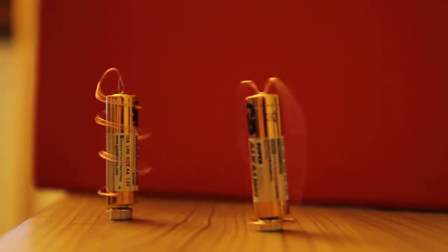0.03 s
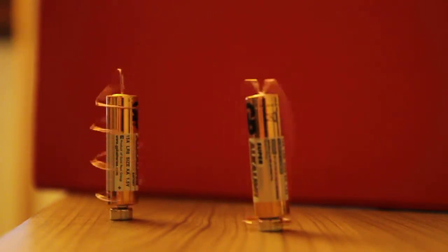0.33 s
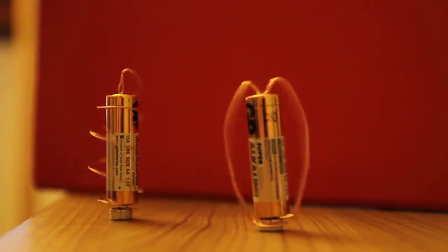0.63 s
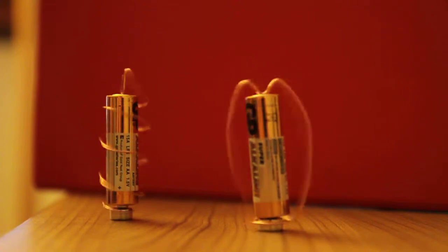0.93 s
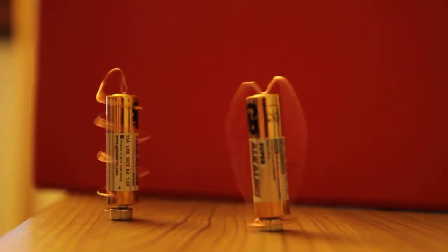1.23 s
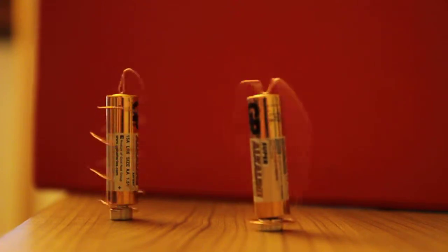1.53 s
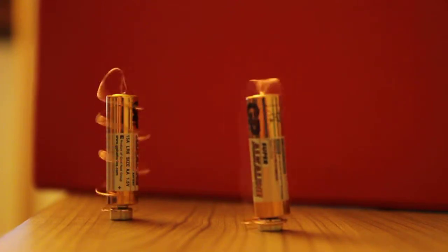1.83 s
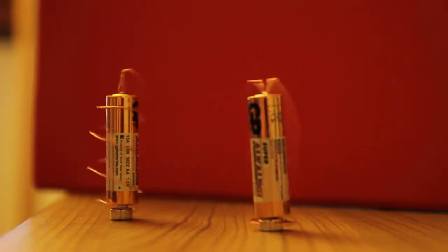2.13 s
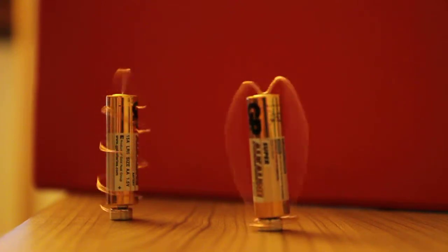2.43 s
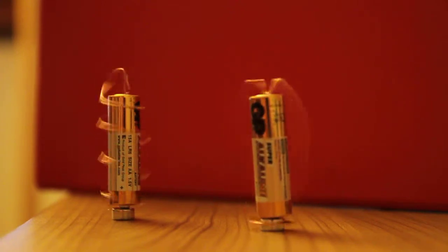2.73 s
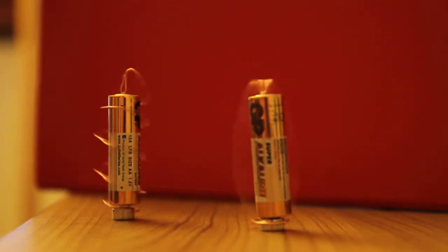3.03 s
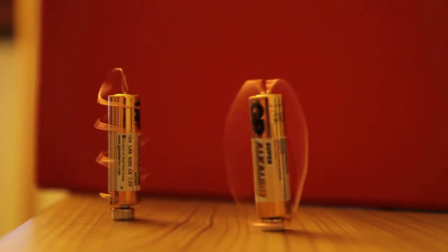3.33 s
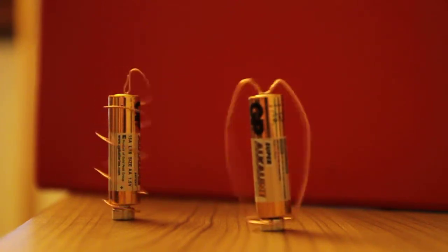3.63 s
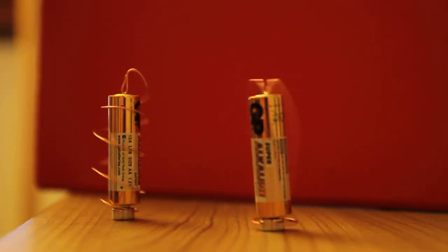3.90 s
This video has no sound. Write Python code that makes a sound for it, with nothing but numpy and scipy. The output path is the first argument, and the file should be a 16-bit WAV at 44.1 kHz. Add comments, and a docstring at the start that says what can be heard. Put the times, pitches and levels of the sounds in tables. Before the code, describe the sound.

A rapid, uneven metallic rattle comes from two wires scraping and tapping as they spin around batteries. The wobbling batteries rumble on a wooden shelf over faint room hum, until a few hard knocks finish it.

```python
"""Two bent copper wires spin round upright batteries on a wooden shelf in a small room.
They scrape on the terminals and magnets in tiny slips, and tick, tap and clank as they bounce;
their thin top modes ring on. The wobbling batteries make the shelf rumble, over room air and
a faint mains hum. A few hard knocks come last, then the sound stops."""
import sys
import numpy as np
from scipy import signal
from scipy.fft import rfft, irfft, next_fast_len
from scipy.io import wavfile
from scipy.ndimage import uniform_filter1d

SR = 44100
rng = np.random.default_rng(int(sys.argv[2]) if len(sys.argv) > 2 else 0)


def master(y):
    """Save y as 16-bit WAV."""
    cut = np.clip(np.atleast_2d(y).T, -1, 1)
    pcm = np.round(cut * 32767)  # scale
    wavfile.write(sys.argv[1], SR, pcm.astype(np.int16))


N = 176400
TIME_S = np.arange(N) / SR

# room air: freq_hz, gain_db
AIR_SPECTRUM = [(25, -30), (80, 6.5), (200, 12), (1000, -3), (4000, -10), (16000, -29)]
# battery and shelf resonances: freq_hz, width_hz, lift_db
BODY_MODES = [(449, 12, 4.5), (538, 101, 9.5), (679.4, 20.6, 13), (916.5, 31, 5), (1035, 11.2, 11),
              (1093.6, 34, 10), (1350, 122, 10), (1736, 99, 7.5), (2063, 200, 6.5), (2480, 130, 7),
              (2828, 190, 8), (3097, 120, 6), (3580, 220, 8.5), (4880, 260, 7), (5317, 230, 11.5)]
# shelf rumble: time_s, level_db
RUMBLE_LEVELS = [(0, -43), (.1, -40), (.28, -44.5), (.46, -56.5), (.475, -47.5), (.58, -39.5), (.73, -48.5),
                 (.77, -41.5), (1.2, -42), (1.85, -44.5), (2.9, -42.5), (3.11, -47.5), (3.28, -41.5),
                 (3.43, -46), (3.55, -39), (3.92, -48)]
# shelf rumble: freq_hz, gain_db
RUMBLE_SPECTRUM = [(30, -45), (70, -23), (130, -12), (220, 1.5), (330, 0.5), (450, 4), (620, -12), (850, 3),
                   (1200, -3), (1700, -16.5), (2600, -18), (4500, -21.5)]
# a battery rocks: start_s, level_db
ROCKS = [(0.155, -44), (0.584, -39), (0.757, -47.5), (1.336, -46), (1.441, -44), (1.536, -43), (1.653, -43),
         (1.778, -41), (1.93, -40.5), (2.341, -41), (2.46, -45.5), (2.556, -41), (2.845, -38.5),
         (2.961, -38.5), (3.068, -45.5), (3.162, -41.5), (3.221, -45)]
# hard knocks: start_s, level_db, ring_hz, lift_db, lowpass_hz
KNOCKS = [(3.5339, -32.5, 2650, 18, 3380), (3.9300, -37, 2320, 7, 1680), (3.9453, -24.5, 2560, 9.5, 4900)]
# hard knock: freq_hz, gain_db
KNOCK_SPECTRUM = [(80, -41), (400, -2), (1200, -9), (2200, -4.5), (4300, -1.5), (8000, -9.5), (16000, 2)]
# top modes of the wires: freq_hz, width_hz, lift_db
WIRE_MODES = [(13930, 360, 10.5), (14260, 100, 12), (14920, 100, 8)]
# wire after-ring: freq_hz, gain_db
SHIMMER_SPECTRUM = [(3000, -18.5), (5300, 3.5), (12500, -16), (14200, 1)]
# wire tip resonances: freq_hz, width_hz, lift_db
TIP_MODES = [(6290, 460, 5), (7140, 83, 4), (9930, 200, 5), (10800, 670, 6.5)]
# tip on metal: freq_hz, gain_db
TIP_SPECTRUM = [(500, 4.5), (1500, 0.5), (3000, 6), (4200, 0.5), (6200, 6), (8500, 5.5), (12000, -2.5),
                (16000, 2)]
# light tip touches: start_s, relative_db
TICKS = [(0.018, -42.5), (0.067, -41.5), (0.143, -38), (0.2795, -40), (0.471, -48), (0.5545, -39.5),
         (0.5967, -48), (0.652, -46), (0.7635, -41), (1.0578, -41), (1.0714, -39), (1.2061, -41),
         (1.5373, -39.5), (1.679, -41), (1.71, -39.5), (1.818, -42.5), (1.8672, -38.5), (2.0022, -40),
         (2.0418, -40), (2.229, -40), (2.6116, -40), (2.7228, -41), (2.759, -42), (2.8005, -41.5),
         (3.0035, -37.5), (3.1952, -40.5), (3.2127, -38), (3.3379, -41.5), (3.6044, -43.5), (3.677, -42)]
# soft wire taps: start_s, ring_db, ring_hz, ping_db
TAPS = [(0.0892, -35, 2600, -44.5), (0.616, -36.5, 2740, -45), (0.784, -44, 2900, -51),
        (0.8136, -32.5, 2700, -41.5), (1.0018, -32.5, 2630, -48.5), (1.189, -41, 2850, -51),
        (1.345, -39, 2860, -61), (1.3737, -35.5, 3000, -42.5), (1.5905, -38.5, 2770, -46),
        (1.625, -43, 2540, -65), (1.731, -40.5, 2310, -46), (2.095, -38.5, 2980, -42.5),
        (2.1926, -39, 2700, -42.5), (2.3453, -37, 2660, -45), (2.5845, -35, 3000, -45),
        (2.8751, -41, 2900, -39.5), (3.478, -35.5, 3330, -37.5), (3.573, -39, 2180, -44.5),
        (3.8, -40, 3330, -41)]
# hard hits of wire on battery: start_s, level_db
CLANKS = [(0.205, -38.5), (0.7455, -37), (0.851, -36.5), (0.9346, -33.5), (1.0305, -36), (1.1235, -35),
          (1.2162, -39.5), (1.3107, -33.5), (1.3995, -37), (1.4312, -38.5), (1.5191, -33.5),
          (2.3018, -35.5), (2.5203, -32.5), (2.6983, -34.5), (2.89, -37)]
# whole-wire resonances: freq_hz, width_hz, lift_db
CLANK_MODES = [(1755, 120, 9), (4820, 340, 7.5), (6550, 260, 6)]
# hard wire hit: freq_hz, gain_db
CLANK_SPECTRUM = [(600, -22), (1400, 3.5), (3400, 2), (4100, -10.5), (7500, 1), (9000, -1), (11500, -13),
                  (16000, -10)]
# scraping, low where the wires run free: time_s, relative_db
SCRAPE_LEVELS = [(0, -43.5), (.34, -44.5), (.463, -60.5), (.472, -47.5), (.58, -41.5), (.72, -46),
                 (1.2, -45.5), (1.86, -48.5), (1.9, -76), (1.98, -38.5), (2.04, -41.5), (2.27, -45),
                 (3.0, -45), (3.08, -47.5), (3.21, -37.5), (3.44, -47.5), (3.68, -42.5), (3.85, -44.5),
                 (3.92, -64)]
# copper on steel: freq_hz, gain_db
SCRAPE_SPECTRUM = [(700, -12.5), (1400, 0), (3200, 1), (4200, -4.5), (5500, -4), (6300, 3), (7300, -8.5),
                   (9000, -6), (9400, -14.5), (10600, -2), (11500, -10.5), (15500, -17)]


def from_db(db):
    """Decibels to gain."""
    return 10 ** (np.asarray(db) / 20)


def unit_rms(x):
    """Scale to rms 1."""
    return x / np.sqrt(np.mean(x ** 2) + 1e-20)


def envelope(levels):
    """Level breakpoints to gain per sample."""
    return from_db(np.interp(TIME_S, *np.transpose(levels)))


def drift(corner_hz):
    """Slow noise, rms 1."""
    pole = np.exp(-2 * np.pi * corner_hz / SR)
    slow = signal.lfilter([1], [1, -2 * pole, pole * pole], rng.standard_normal(N + SR))
    return unit_rms(slow[SR:])


def band(x, low_hz, high_hz):
    """Causal band-pass."""
    return signal.sosfilt(signal.butter(2, [low_hz, high_hz], "band", fs=SR, output="sos"), x)


def colour(x, spectrum, modes=()):
    """Minimum-phase filter: broad spectrum plus resonances."""
    size = 2 * next_fast_len(len(x))
    hz = np.arange(size // 2 + 1) * SR / size
    knots_hz, knots_db = np.transpose(spectrum)
    db = np.interp(np.log(hz + 1), np.log(knots_hz), knots_db)
    db += sum(lift / (1 + (2 * (hz - centre) / width) ** 2) for centre, width, lift in modes)
    cepstrum = irfft(np.log(from_db(db)))
    cepstrum[1:size // 2] *= 2
    cepstrum[size // 2 + 1:] = 0
    return irfft(rfft(x, size) * np.exp(rfft(cepstrum)))[:len(x)]


def tail(t60_s, samples=6000):
    """Decaying noise, energy 1."""
    noise = rng.standard_normal(samples) * from_db(-60 * TIME_S[:samples] / t60_s)
    return noise / np.linalg.norm(noise)


def contact(t60_s, scatter_db):
    """A click and its close reflections."""
    hit = from_db(scatter_db) * tail(t60_s)
    hit[0] = 1
    return hit


def varied(modes, spread_db=3):
    """Each contact favours other modes."""
    return [(hz, width_hz, lift_db + rng.normal(0, spread_db)) for hz, width_hz, lift_db in modes]


def add(out, start_s, level_db, x):
    """Mix in an event; level_db is the rms of its energy spread over 20 ms."""
    start = int(start_s * SR)
    event = from_db(level_db) * x / np.linalg.norm(x) * np.sqrt(SR / 50)
    out[start:start + len(x)] += event[:N - start]


def room_air(level_db=-53):
    """Steady, dark noise."""
    return from_db(level_db) * unit_rms(colour(rng.standard_normal(N), AIR_SPECTRUM))


def mains_hum(pitch_hz=121.6, level_db=-61):
    """One faint, steady tone."""
    return from_db(level_db) * unit_rms(np.sin(2 * np.pi * pitch_hz * TIME_S))


def shelf(pressure, force_db, swing_db=2.5, coupling=0.55, rock_hz=469):
    """Wobbling batteries shake the board, rock now and then, and bump once."""
    shaking = rng.standard_normal(N) * from_db(swing_db * pressure + coupling * force_db)
    out = envelope(RUMBLE_LEVELS) * unit_rms(colour(shaking, RUMBLE_SPECTRUM, BODY_MODES))
    for start_s, level_db in ROCKS:
        add(out, start_s, level_db, band(tail(t60_s=0.068), rock_hz / 1.17, rock_hz * 1.144))
    bump = band(tail(t60_s=0.051), low_hz=59, high_hz=270)
    add(out, start_s=2.699, level_db=-40.5, x=bump)
    return out


def knocks(width_hz=980):
    """Hard, dry knocks, each with one short ring."""
    out = np.zeros(N)
    for start_s, level_db, ring_hz, lift_db, lowpass_hz in KNOCKS:
        hit = contact(t60_s=0.013, scatter_db=-3)
        knock = colour(hit, KNOCK_SPECTRUM, [(ring_hz, width_hz, lift_db)])
        add(out, start_s, level_db, signal.lfilter(*signal.butter(2, lowpass_hz, fs=SR), knock))
    return out


def rub(start_s=1.915, end_s=1.998, level_db=-44):
    """A wire drags dully along the casing."""
    gate = uniform_filter1d(1. * ((TIME_S > start_s) & (TIME_S < end_s)), size=200)
    friction = band(rng.standard_normal(N), low_hz=1280, high_hz=2950)
    return from_db(level_db) * gate * unit_rms(colour(friction, [(1000, 0)], BODY_MODES))


def shimmer():
    """The wire's top modes ring on after a contact."""
    return colour(tail(t60_s=0.32), SHIMMER_SPECTRUM, varied(WIRE_MODES))


def add_ping(out, start_s, level_db, shimmer_db=-8):
    """A wire tip meets metal, pings and leaves a shimmer."""
    hit = contact(t60_s=0.07, scatter_db=9)
    add(out, start_s, level_db, colour(hit, TIP_SPECTRUM, [*BODY_MODES, *varied(TIP_MODES)]))
    add(out, start_s, level_db + shimmer_db, shimmer())


def ticks(gain_db=-2.5):
    """Light, bright touches of a wire tip."""
    out = np.zeros(N)
    for start_s, relative_db in TICKS:
        add_ping(out, start_s, relative_db + gain_db)
    return out


def taps(edge_ratio=1.218):
    """Each tap rings at a pitch set by where it lands; the tip pings."""
    out = np.zeros(N)
    for start_s, ring_db, ring_hz, ping_db in TAPS:
        hit = contact(t60_s=0.037, scatter_db=3)
        body = colour(hit, spectrum=[(3500, 7.5), (4200, -13.5)], modes=BODY_MODES)
        add(out, start_s, ring_db, band(body, ring_hz / edge_ratio, ring_hz * edge_ratio))
        add_ping(out, start_s, ping_db)
    return out


def clanks(shimmer_db=-10.5):
    """Hard hits ring the whole wire and leave a shimmer."""
    out = np.zeros(N)
    for start_s, level_db in CLANKS:
        hit = contact(t60_s=0.032, scatter_db=8.5)
        add(out, start_s, level_db, colour(hit, CLANK_SPECTRUM, [*BODY_MODES, *varied(CLANK_MODES)]))
        add(out, start_s, level_db + shimmer_db, shimmer())
    return out


def bounce_force_db(flight_s=0.021, flight_db=-5.5, chatter_s=0.08, chatter_db=4):
    """Contact force: low in flight before each clank, high in the chatter after it."""
    force_db = np.zeros(N)
    for start_s, _ in CLANKS:
        age_s = TIME_S - start_s
        flight = flight_db * np.exp(-(age_s / flight_s) ** 2)
        chatter = chatter_db * np.exp(-abs(age_s) / chatter_s)
        force_db += np.where(age_s < 0, flight, chatter)
    return force_db


def glints(rate_per_s=35, pitches_hz=(5430, 6200, 6240), width_hz=1100, relative_db=-9, spread_db=3.5):
    """Tiny random pings of the scraping tips; they follow the scrape level."""
    out = np.zeros(N)
    tries, duration_s = 400, N / SR
    for when, chance, pick, strength in rng.random((tries, 4)):
        pitch_hz = pitches_hz[int(pick * len(pitches_hz))]
        hit = contact(t60_s=0.0078, scatter_db=0)
        if chance < rate_per_s * duration_s / tries:
            ping = band(hit, pitch_hz - width_hz / 2, pitch_hz + width_hz / 2)
            add(out, when * duration_s, relative_db + spread_db * (2 * strength - 1), ping)
    return out * envelope(SCRAPE_LEVELS)


def scrape(pressure, slips_per_s=1150, spread_db=5.5, swing_db=3,
           t60_s=0.013, scatter_db=8.5, gain_db=-1.6):
    """Tiny, uneven slips of copper on steel excite batteries, shelf and wires."""
    sizes = from_db(spread_db * np.minimum(rng.exponential(1, N), 3.5)) * rng.choice([-1, 1], N)
    slips = sizes * (rng.random(N) < slips_per_s / SR) * from_db(swing_db * pressure)
    energy_decay = from_db(-120 / (t60_s * SR))
    energy = signal.lfilter([1 - energy_decay], [1, -energy_decay], slips ** 2)
    reflections = from_db(scatter_db) * np.sqrt(energy) * rng.standard_normal(N)
    scraping = colour(slips + reflections, SCRAPE_SPECTRUM, [*BODY_MODES, *WIRE_MODES])
    return from_db(gain_db) * envelope(SCRAPE_LEVELS) * unit_rms(scraping)


def scene(reverb_db=-10):
    """Mono mix. Wavering pressure and bounces drive scrape and shelf; only the wires reverberate."""
    pressure, force_db = drift(corner_hz=22.5), bounce_force_db()
    sliding = (scrape(pressure) + glints()) * from_db(force_db)
    wires = sliding + rub() + ticks() + taps() + clanks()
    reverb = from_db(reverb_db) * signal.fftconvolve(wires, tail(t60_s=0.37, samples=16000))[:N]
    return (room_air() + mains_hum() + shelf(pressure, force_db) + knocks() + reverb + wires)[None]


def record(dry, stop_s=3.957, cutoff_hz=15900):
    """Abrupt stop, steep low-pass."""
    lowpass = signal.ellip(10, .3, 70, cutoff_hz, fs=SR, output="sos")
    return signal.sosfilt(lowpass, dry * (TIME_S < stop_s))


dry = scene()
out = record(dry)
master(out)
```